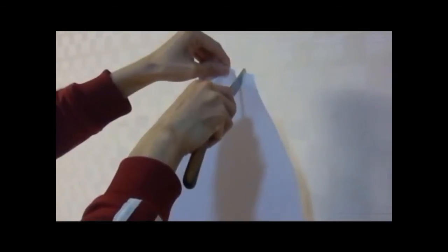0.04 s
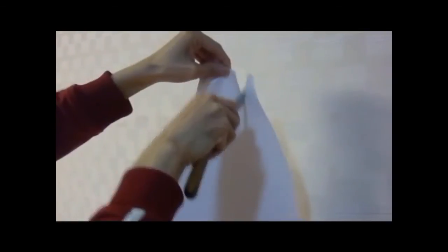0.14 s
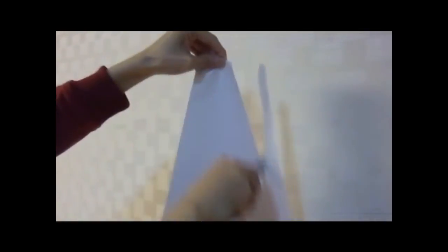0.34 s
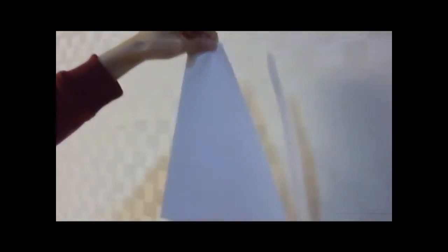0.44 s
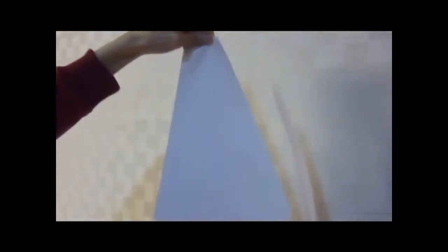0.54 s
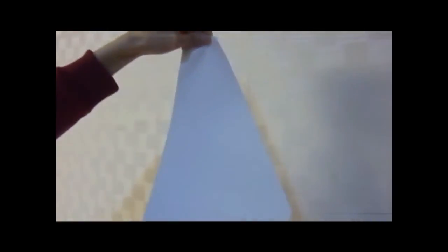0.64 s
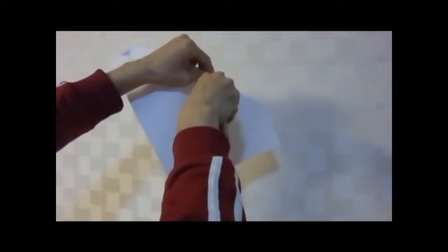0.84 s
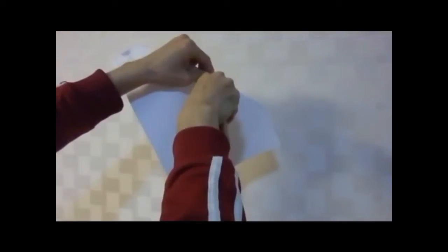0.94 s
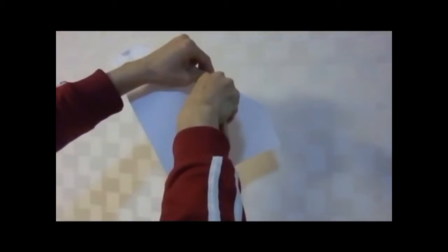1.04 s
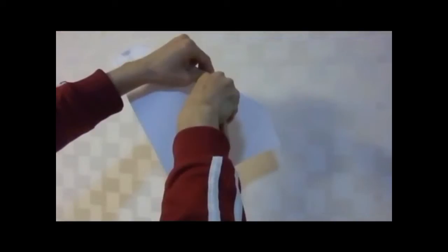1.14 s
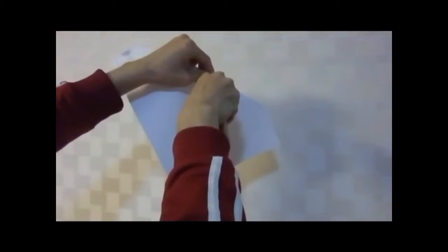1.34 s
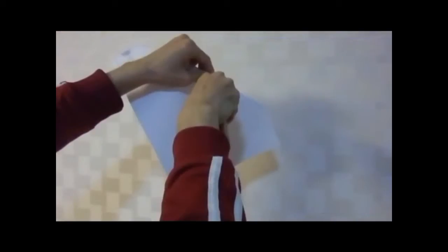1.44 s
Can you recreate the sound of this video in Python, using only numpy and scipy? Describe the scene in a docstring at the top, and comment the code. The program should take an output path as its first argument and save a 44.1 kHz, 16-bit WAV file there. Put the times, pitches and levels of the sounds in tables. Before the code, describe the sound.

A sharp blade slices paper close to the microphone. Light ticks catch the edge during the first 0.2 seconds, then one loud, crisp cut hisses and brightens until about 0.4 seconds, ending in a short scrape and papery flaps. The strip slides softly away from 0.6 to 0.9 seconds. A faint dull knock comes near 1.2 seconds, with slight rustling over quiet room hiss.

```python
"""Faint rustling in a quiet room, then a sharp blade ticks on the top of a hand-held sheet of paper.
Close to the microphone it bites and slices down in one quick stroke: fibres snap in a dense hiss
that brightens towards the bottom edge. The blade rubs clear, the freed strip flaps and slides away,
and one soft knock follows. The recorder's gain ducks under the cut and recovers."""
import sys
import numpy as np
from scipy import signal
from scipy.fft import rfft, irfft
from scipy.io import wavfile
from scipy.ndimage import uniform_filter1d

SR = 44100
rng = np.random.default_rng(int(sys.argv[2]) if len(sys.argv) > 2 else 0)


def unload_audio(sound):
    """Save the sound as a 16-bit wav file, at the path given as the first command line argument."""
    columns = np.transpose(np.atleast_2d(sound))
    # keep every value between -1 and 1, then stretch to whole-number steps
    steps = np.round(np.clip(columns, -1, 1) * 32767)
    wavfile.write(sys.argv[1], SR, steps.astype(np.int16))


N = 66150
TIME = np.arange(N) / SR
BIN_HZ = np.arange(N // 2 + 1) * SR / N
ECHO_STRENGTH, DIRECT_DB = 0.94, -2.5  # reflections at the top of the sheet; bare snaps beside its ring


def from_db(db):
    """Decibels to gain."""
    return 10 ** (np.asarray(db) / 20)


def rms_one(x):
    """Scale to an rms of 1."""
    return x / np.sqrt(np.mean(x ** 2) + 1e-20)


def level(rows):
    """Gain over time from rows of seconds and dB; silent outside them."""
    times, db = np.transpose(rows)[:2]
    return from_db(np.interp(TIME, times, db)) * (TIME >= times[0]) * (TIME <= times[-1])


def coloured(x, spectrum):
    """Shape a flat sound by rows of Hz and dB, at an rms of 1."""
    hz, db = np.transpose(spectrum)
    curve_db = np.interp(np.log(np.maximum(BIN_HZ, 1)), np.log(hz), db)
    return rms_one(irfft(rfft(x) * from_db(curve_db), N))


def resonance(x, hz, width_hz):
    """Two-pole resonance with a gain of 1 at its peak."""
    r = np.exp(-np.pi * width_hz / SR)
    feedback = [1, -2 * r * np.cos(2 * np.pi * hz / SR), r * r]
    return signal.lfilter(np.array([1, 0, -1]) * (1 - r * r) / 2, feedback, x)


def grains(per_s, spread_db):
    """Random tiny snaps of uneven size and either sign."""
    sizes = from_db(spread_db * np.minimum(rng.exponential(1, N), 5))
    signs = rng.choice([-1, 1], N)
    return sizes * signs * (rng.random(N) < per_s / SR)


def room():
    """Room tone behind the paper: steady hiss, and a low rumble that comes and goes."""
    # The hiss. Each row: frequency in Hz, relative level in dB.
    hiss_colour = [(20, 7), (45, 8.5), (75, 13), (105, 13.5), (220, 15), (500, 10.5), (1000, 5), (2000, 2),
                   (4500, -2), (10000, 0), (12500, -5.5), (14500, -9)]
    # The rumble's swells. Each row: time in seconds, level in dB.
    rumble_levels = [(0, -77), (.05, -63), (.18, -74), (.27, -64), (.38, -58), (.47, -71.5), (.65, -62.5),
                     (.8, -64), (.9, -72), (.98, -66), (1.12, -71), (1.21, -59.5), (1.36, -62)]
    rumble = rng.standard_normal(N)
    for _ in range(2):
        rumble = resonance(rumble, hz=70.6, width_hz=23)
    hiss = from_db(-57.5) * coloured(rng.standard_normal(N), hiss_colour)
    return hiss + level(rumble_levels) * rms_one(rumble)


def rustle():
    """Sleeve and sheet give off fine friction grains as the hands move."""
    # The hands' movement. Each row: time in seconds, level in dB.
    rustle_levels = [(0, -66), (.07, -59.5), (.14, -58), (.21, -57), (.44, -76.5), (.9, -64), (1.0, -63),
                     (1.055, -57.5), (1.13, -77), (1.3, -75), (1.345, -54), (1.378, -53)]
    # Tone of sleeve and sheet. Each row: frequency in Hz, relative level in dB.
    rustle_colour = [(150, 4), (500, 5.5), (1000, 0), (3200, -3.5), (4500, -2), (6500, -0.5), (10500, 1.5),
                     (12500, -1), (14500, -14.5)]
    return level(rustle_levels) * coloured(grains(per_s=22000, spread_db=1.7), rustle_colour)


def blade_ticks():
    """Each catch on the top edge breaks a few fibres in a burst that dies fast."""
    # The catches. Each row: start in seconds, level in dB, seconds to fall 60 dB, body gain in dB.
    catches = [(.0453, -38, 0.016, 6), (.099, -57, 0.011, 4), (.103, -49.5, 0.028, 2),
               (.157, -40, 0.013, -8), (0.184, -53.5, .03, -7), (0.188, -47, 0.043, -13),
               (.202, -40, 0.057, -4), (0.2074, -36, 0.026, -3), (.213, -40, 0.037, -4.5)]
    # Tone of a tick. Each row: frequency in Hz, relative level in dB.
    tick_colour = [(200, -8.5), (1100, 0.5), (1500, -3), (2200, -1.5), (3300, -2), (5000, -8.5), (6500, -3),
                   (8000, -11.5), (9400, 0.5), (12000, -0.5), (13500, -12.5), (14700, -20)]
    tail_db, tail_t60_s, body_edge_hz, ring_share = -16, .12, 4300, .35
    snaps = coloured(grains(per_s=6400, spread_db=2.5), tick_colour)
    body = signal.sosfiltfilt(signal.butter(4, body_edge_hz, fs=SR, output="sos"), snaps)
    treble = snaps - body
    ticks = np.zeros(N)
    for start, db, t60, body_db in catches:
        age = np.maximum(TIME - start, 0)
        tail = from_db(tail_db - 60 * age / tail_t60_s)
        burst = (TIME >= start) * np.hypot(from_db(-60 * age / t60), tail)
        ticks += from_db(db) * burst * (treble + from_db(body_db) * body)
    ring = ring_share * sheet_ring(ticks, depth=0)
    return near_echoes(from_db(DIRECT_DB) * ticks + ring, ECHO_STRENGTH)


def sheet_ring(x, depth):
    """The sheet resonates; the strength of each mode shifts with the blade's depth."""
    # Each row: frequency in Hz, width in Hz, gain in dB with the blade at the top, and at the bottom.
    sheet_modes = [(1606, 190, -7.5, -2.5), (2218, 60, -0.5, -6), (3020, 46, -2, -10),
                   (3136, 120, 1.5, -5.5), (3330, 80, -4, -7), (4420, 70, -2, -12), (4950, 130, -15, -9),
                   (5820, 40, 0.5, -15.5), (6570, 64, -2, -7.5), (7120, 31, -4.5, -6), (7730, 210, -14, -3),
                   (9330, 130, -16, 1), (9370, 150, -4, -5.5), (10440, 50, -17.5, 11.5),
                   (12200, 160, -3, -8.5)]
    return sum(from_db(top_db + depth * (bottom_db - top_db)) * resonance(x, hz, width)
               for hz, width, top_db, bottom_db in sheet_modes)


def near_echoes(x, strength):
    """Reflections off the hand and paper reach the microphone just late and comb the spectrum."""
    # Each row: delay in seconds, signed relative gain.
    reflections = [(.000635, .33), (.001131, -.3), (.001188, .18), (.000488, -.18)]
    response = sum(gain * np.exp(-2j * np.pi * BIN_HZ * delay) for delay, gain in reflections)
    return x + strength * irfft(rfft(x) * response, N)


def slice_through():
    """Fibres snap under the juddering blade, brighter as it travels down the sheet."""
    # The stroke. Each row: time in seconds, level in dB, depth from 0 (top) to 1 (bottom).
    stroke = [(0.223, -49, 0.3), (.229, -34.5, 0.06), (0.24, -22, 0.09), (.268, -16, .05),
              (.292, -11.5, .15), (.312, -10, 0.6), (.338, -8.5, .7), (.354, -7, 0.97), (.370, -8.5, 1),
              (.375, -32.5, 1)]
    # Tone of the cut near the top and near the bottom. Each row: frequency in Hz, relative level in dB.
    top_colour = [(100, -28), (500, -19), (900, -12.5), (1400, -13), (2200, -2), (3200, -4), (4200, 0),
                  (6500, 0), (9300, -3), (12200, -0.5), (14500, -16.5)]
    bottom_colour = [(100, -32), (500, -24), (900, -22.5), (1400, -12.5), (2200, -14), (3200, -11.5),
                     (5000, -10), (6800, -1.5), (9500, 1.5), (12200, -0.5), (14500, -18.5)]
    # Tough spots that snag the blade. Each row: time in seconds, surge in dB.
    snags = [(0.2649, 4.5), (0.2896, 1.5), (0.334, 2.5), (.350, 3.5)]
    judder_db, snag_s = 0.77, .0016
    times, _, depths = np.transpose(stroke)
    depth = np.clip(np.interp(TIME, times, depths), 0, 1)
    judder = rms_one(resonance(rng.standard_normal(N), hz=108, width_hz=108))
    surge_db = sum(db * np.exp(-((TIME - at) / snag_s) ** 2) for at, db in snags)
    snaps = grains(per_s=30000, spread_db=1.5) * from_db(judder_db * judder + surge_db)
    hiss = (1 - depth) * coloured(snaps, top_colour) + depth * coloured(snaps, bottom_colour)
    cut = from_db(DIRECT_DB) * hiss + sheet_ring(hiss, depth)
    echo_strength = ECHO_STRENGTH * (1 - 0.96 * depth)  # almost gone at the bottom edge
    return level(stroke) * near_echoes(cut, echo_strength)


def blade_rub():
    """The flat of the blade scrapes the freed edge until it comes clear."""
    # The scrape. Each row: time in seconds, level in dB.
    rub_levels = [(.366, -36), (.374, -15.5), (.386, -20), (.404, -23), (.418, -24.5), (.430, -29),
                  (.436, -57), (.445, -80)]
    # Tone of blade on paper. Each row: frequency in Hz, relative level in dB.
    rub_colour = [(100, -18), (250, -9), (750, -10.5), (1100, -4.5), (1900, -9.5), (3200, -7), (5000, -6),
                  (6500, -1.5), (9500, 2), (12200, -4), (14500, -19.5)]
    return level(rub_levels) * coloured(grains(per_s=14000, spread_db=2.5), rub_colour)


def paper_flaps():
    """The loose paper flexes in short pops, each a brief tone that swells and fades."""
    # The pops. Each row: start in seconds, frequency in Hz, peak level in dB, length in seconds.
    flexes = [(.366, 1420, -25, .007), (.367, 488, -25.5, 0.0097), (.375, 224, -30, 0.013),
              (.382, 1153, -29.5, .009), (0.406, 1008, -24, 0.01), (.407, 3000, -31.5, 0.0084),
              (.526, 1610, -50, 0.0036), (.936, 565, -47.5, 0.02)]
    pops = np.zeros(N)
    for start, hz, db, length in flexes:
        age = TIME - start
        swell = np.sin(np.pi * np.clip(age / length, 0, 1)) ** 2
        pops += from_db(db) * swell * np.sin(2 * np.pi * hz * age)
    return pops


def strip_slide():
    """The cut strip slides away in a soft swell of friction grains."""
    # The slide. Each row: time in seconds, level in dB.
    slide_levels = [(.5, -61.5), (.66, -57.5), (.71, -51.5), (.77, -46.5), (.83, -45.5), (.88, -51.5),
                    (.95, -63.5), (1.03, -81)]
    # Tone of the sliding strip. Each row: frequency in Hz, relative level in dB.
    slide_colour = [(150, -14), (350, -4.5), (700, -5), (1400, 1), (2000, -1), (3000, 1), (4800, -0.5),
                    (6000, -1.5), (10500, 1), (12500, -4.5), (14500, -17)]
    return level(slide_levels) * coloured(grains(per_s=22000, spread_db=1.7), slide_colour)


def knock():
    """A dull bump rings a few modes; two low ones linger."""
    # Each row: frequency in Hz, relative level in dB, seconds to fall 60 dB.
    knock_modes = [(130, -19, 0.08), (221, 0, 0.057), (243.4, -6, 0.61), (395.4, -16, 0.68),
                   (590, -3.5, 0.012), (1140, -6.5, 0.015), (1434, -9, 0.084), (1850, -16, .012)]
    start_s, knock_db = 1.183, -42.5
    age = np.maximum(TIME - start_s, 0)
    return -sum(from_db(knock_db + db - 60 * age / t60) * np.sin(2 * np.pi * hz * age)
                for hz, db, t60 in knock_modes)


def scene():
    """Blade, paper and room at one close microphone."""
    blade = blade_ticks() + slice_through() + blade_rub()
    paper = paper_flaps() + strip_slide() + rustle()
    return (blade + paper + knock() + room())[None]


def record(dry):
    """The recorder's gain ducks fast and recovers slowly; the sound stops, and the top treble is cut."""
    threshold_db, squeeze, attack_s, release_db_per_s = -26, 0.49, .004, 14
    stop_s, cutoff_hz = 1.379, 15000
    power = uniform_filter1d(dry[0] ** 2, size=256)
    input_db = 10 * np.log10(np.maximum(power, 1e-12))
    duck_db = squeeze * np.maximum(input_db - threshold_db, 0)
    recovery_db = release_db_per_s * TIME
    held_db = np.maximum.accumulate(duck_db + recovery_db) - recovery_db  # each duck lets go steadily
    pole = np.exp(-1 / (attack_s * SR))
    smooth_db = signal.lfilter([1 - pole], [1, -pole], held_db)
    ducked = dry * from_db(-smooth_db) * (TIME < stop_s)
    return signal.sosfilt(signal.ellip(12, .2, 80, cutoff_hz, fs=SR, output="sos"), ducked)


dry = scene()
out = record(dry)
unload_audio(out)
```